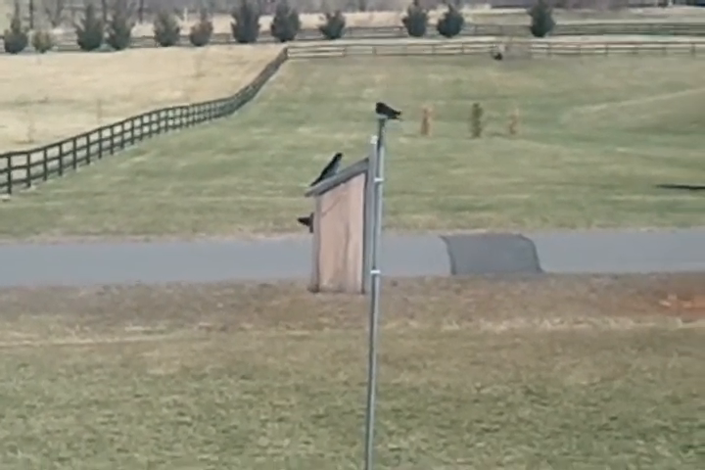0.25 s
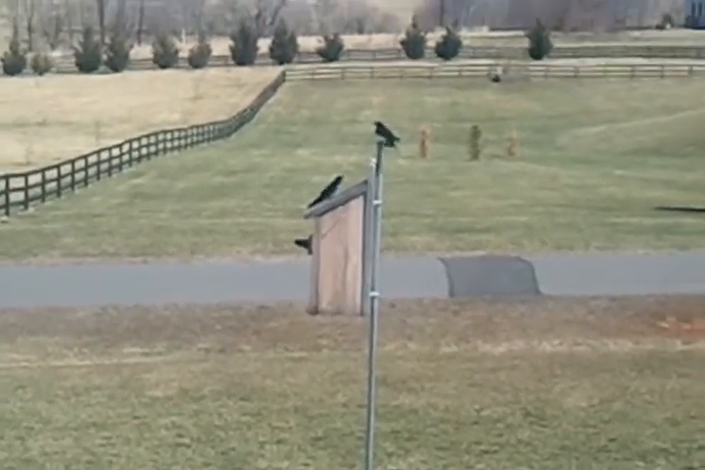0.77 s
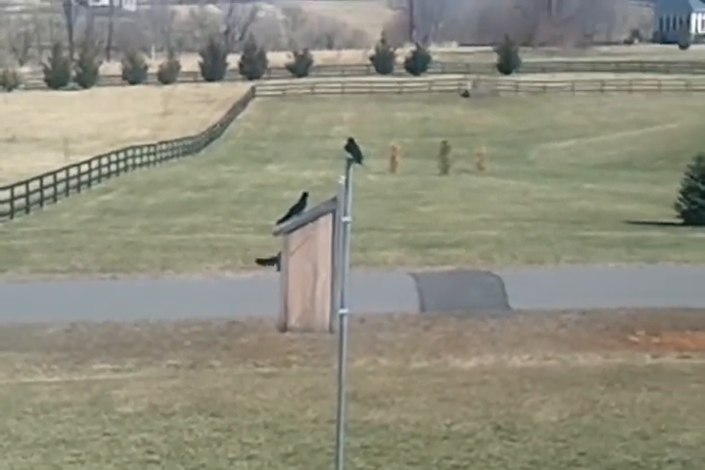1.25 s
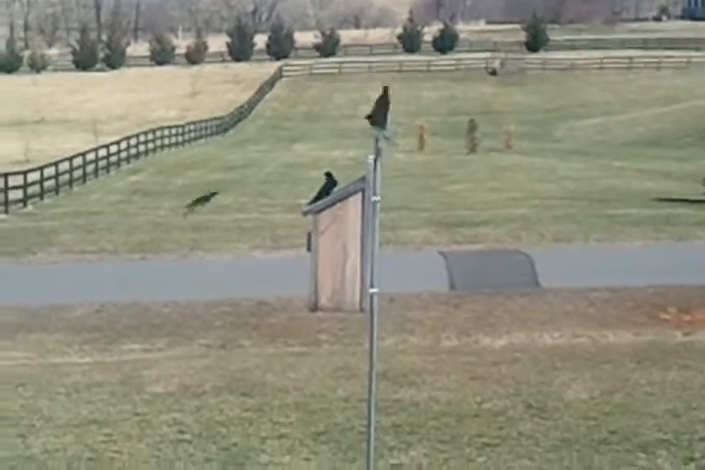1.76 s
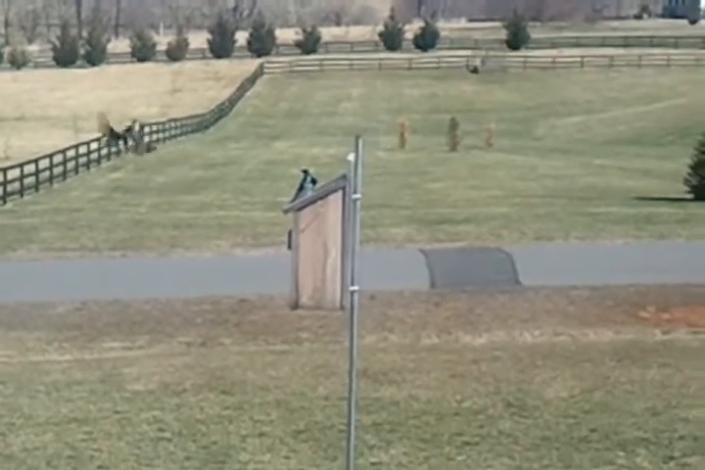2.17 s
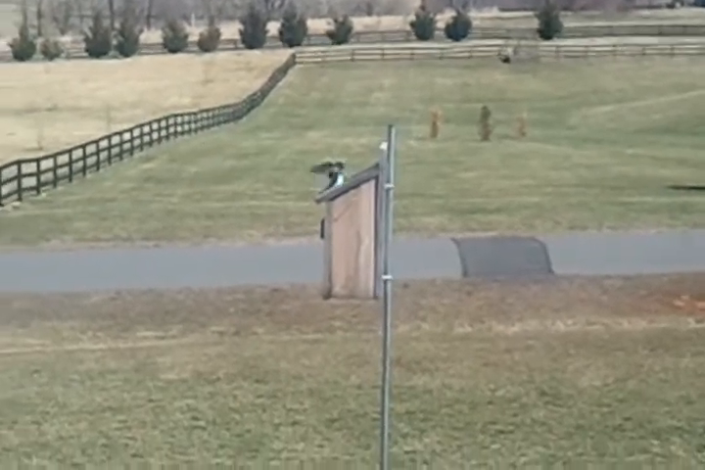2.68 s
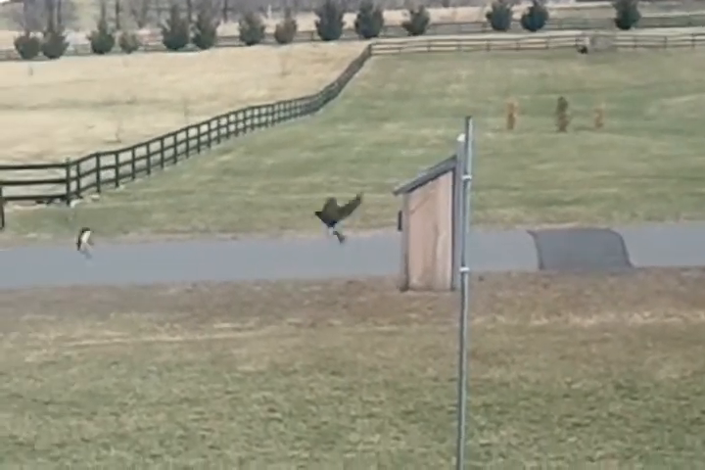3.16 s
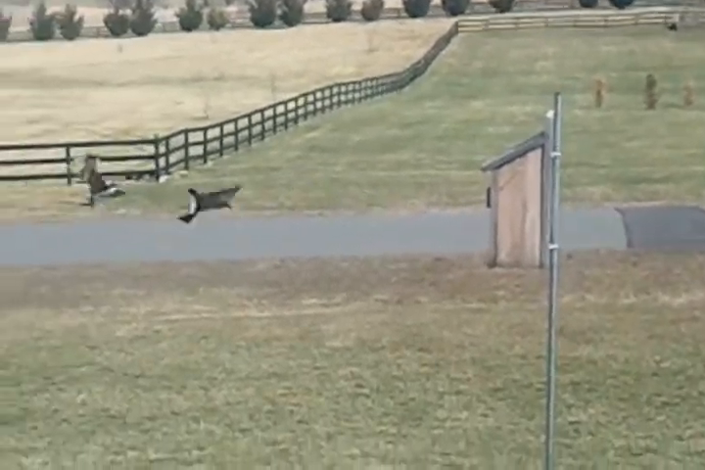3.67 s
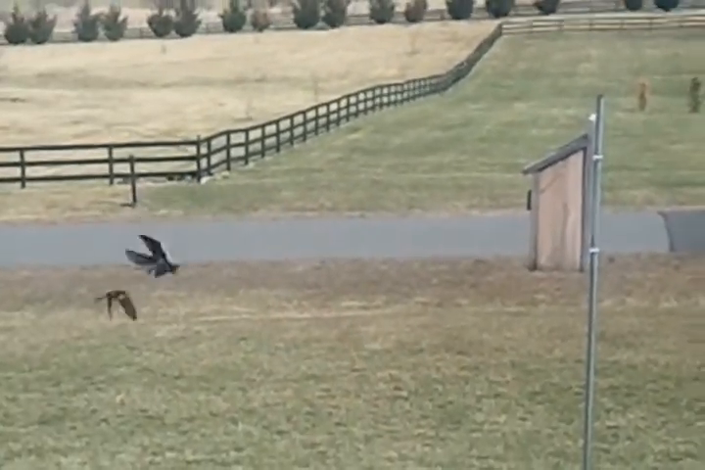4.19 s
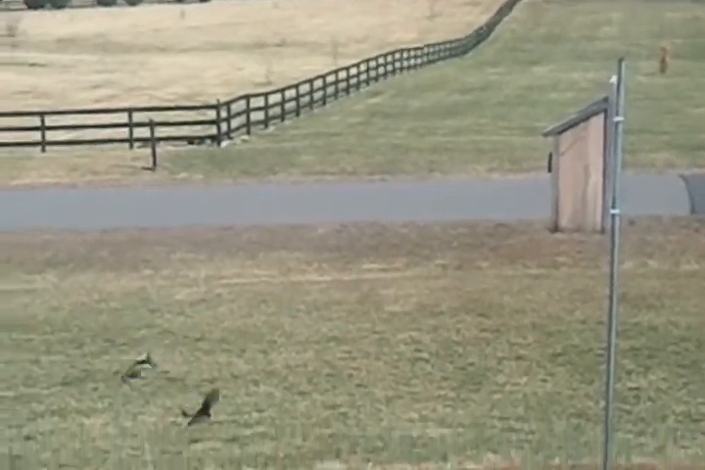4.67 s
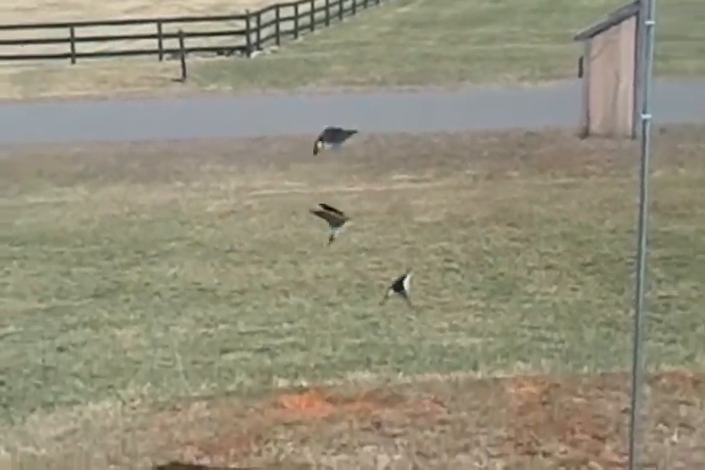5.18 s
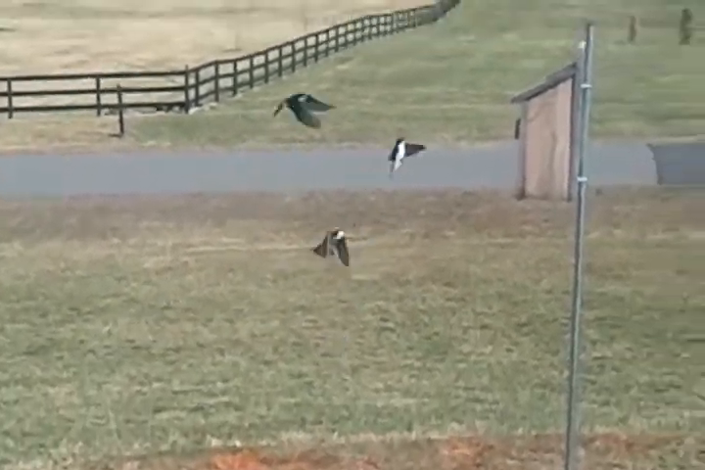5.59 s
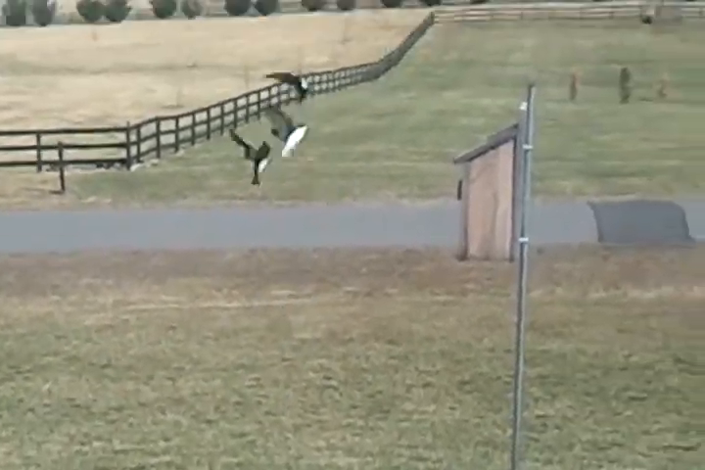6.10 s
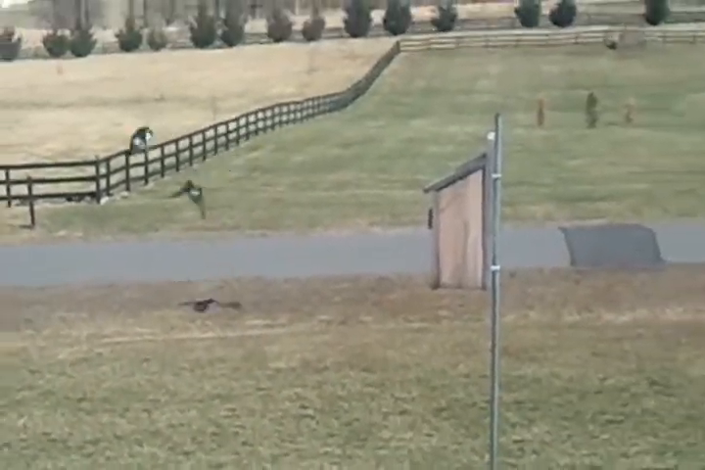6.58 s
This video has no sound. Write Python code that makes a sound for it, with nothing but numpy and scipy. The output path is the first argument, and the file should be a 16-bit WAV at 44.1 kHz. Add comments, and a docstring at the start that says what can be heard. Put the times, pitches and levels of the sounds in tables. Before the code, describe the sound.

Small swallows twitter in rapid, high, chattering bursts around a nest box in an open field while wind rumbles and thumps on the microphone.

```python
"""An open field with a nest box: tree swallows squabble round it, twittering in quick overlapping runs.
Each syllable is four falling whistled notes after a low arched lead-in; single chips and long slurs join them.
Fainter notes and chips come from swallows farther off. The ground and the field return short echoes.
Wind noise and pressure peaks buffet the microphone; a far songbird droops its whistles over shaped-noise hush."""
import sys
import numpy as np
from scipy import signal
from scipy.fft import rfft, irfft
from scipy.io import wavfile
from scipy.ndimage import uniform_filter1d

SR = 44100
rng = np.random.default_rng(int(sys.argv[2]) if len(sys.argv) > 2 else 0)


def digitize_waveform(pressure):
    """Quantize a signal to 16-bit integers and store it at the path in sys.argv[1].

    Rows of a 2-D input are taken as channels; values are limited to [-1, 1].
    """
    field = np.atleast_2d(pressure).T
    bounded = np.clip(field, -1, 1)
    quanta = np.round(bounded * 32767).astype(np.int16)
    wavfile.write(sys.argv[1], SR, quanta)


N = 301644
TIME = np.arange(N) / SR

# Breakpoints of a syllable's four whistled notes, before chance and stretch:
# [t/s from syllable start, f/Hz, level/dB relative]
SYLLABLE_NOTES = [
    [(0, 6140, -23.5), (.0025, 6170, 3), (.0062, 6060, -10.5), (.008, 5440, 2), (.010, 4900, -19.5)],
    [(.009, 5030, -27.5), (.012, 5310, -1.5), (.0152, 5450, 2.5), (.0182, 5300, -6.5), (.021, 4100, -16)],
    [(.0195, 5670, -26.5), (.0218, 5930, 4), (.0245, 5180, 7.5), (.028, 3273, -8), (.0315, 2636, -19.5)],
    [(.030, 4830, -16.5), (.0328, 4600, -0.5), (.036, 3330, 0.5), (.0395, 2600, -11.5), (.047, 2400, -22.5)],
]
# top pitch of the syllable that the notes above describe
USUAL_TOP_HZ = 6300


def from_db(db):
    """Turn decibels into an amplitude factor."""
    return 10 ** (np.asarray(db) / 20)


def rms_one(x):
    """Scale a signal to an RMS of 1."""
    return x / np.sqrt(np.mean(x ** 2) + 1e-20)


def add(out, start, sound):
    """Mix a sound in at a time in seconds, dropping what falls outside."""
    at = round(start * SR) + np.arange(len(sound))
    inside = (at >= 0) & (at < N)
    out[at[inside]] += sound[inside]


def at_hz(points, hz):
    """Read a spectrum's dB on a log-frequency axis."""
    points_hz, points_db = np.transpose(points)
    return np.interp(np.log(hz), np.log(points_hz), points_db)


def drift(cutoff_hz):
    """Smooth random motion of RMS 1: noise below a cutoff, after a second of filter settling."""
    low_pass = signal.butter(2, cutoff_hz, fs=SR, output="sos")
    slow = signal.sosfilt(low_pass, rng.standard_normal(N + SR))
    return rms_one(slow[SR:])


def whistle(hz, gain):
    """A pure tone whose phase accumulates along a pitch track."""
    return gain * np.sin(2 * np.pi * np.cumsum(hz) / SR)


def swallows(syllable_db=0, chip_db=0, slur_db=0):
    """The near birds: each syllable is an arch and four falling notes; lone chips and slurs join the calls."""
    # Chips shaped like a syllable's first note: [t/s, top f/Hz before chance, level/dB before the note shape]
    lone_chips = [(0.92, 5550, -31), (1.963, 6500, -36.5), (2.425, 5990, -18.5), (3.421, 5320, -21),
                  (3.633, 5620, -20), (4.696, 5860, -22), (5.287, 5450, -26), (5.309, 5740, -26)]
    # Long slurred whistles: [t/s, top f/Hz before the slur shape, level/dB before it, length/s]
    long_slurs = [(2.983, 5520, -21.5, .046), (3.025, 5580, -24.5, 0.038), (3.279, 5630, -31, 0.038),
                  (3.361, 5184, -25.5, 0.035), (5.714, 5540, -28.5, .022), (6.095, 5680, -21.5, 0.078),
                  (6.147, 5690, -20, 0.028)]
    # Strength of each of the four notes against its syllable: [level/dB before chance]
    note_strengths = [1, 2, -5.5, -4.5]
    # Loss of each of the four notes in a lower voice: [loss/dB per kHz under the usual top pitch]
    low_voice_loss = [4, 4.5, 0.5, 9.5]
    note_spread_db = 1.82
    arch_lead_s, arch_share, arch_spread = .008, .7, .04  # lead; pitch over syllable top; relative chance

    out = np.zeros(N)
    for s, top_hz, db, opens in syllables():
        # The opening syllable is slower, with a brief, faint arch; arch_s holds for an arch at 4200 Hz
        stretch, arch_db, arch_s = (1.06, -14.5, 0.0044) if opens else (.95, -6.5, .017)
        arch_hz = top_hz * arch_share * (1 + arch_spread * rng.standard_normal())
        arch_sound, rise_s = arch(arch_hz, arch_s)
        add_call(out, s - arch_lead_s - rise_s, from_db(db + arch_db) * arch_sound)

        under_khz = (USUAL_TOP_HZ - top_hz) / 1000
        for shape, note_db, loss in zip(SYLLABLE_NOTES, note_strengths, low_voice_loss):
            chance_db = note_spread_db * rng.standard_normal()
            gain = from_db(db + syllable_db + note_db - loss * under_khz + chance_db)
            sound = gain * note(shape, top_hz / USUAL_TOP_HZ, stretch)
            add_call(out, s + shape[0][0] * stretch, sound)

    for s, top_hz, db in lone_chips:
        chip = note(SYLLABLE_NOTES[0], top_hz / USUAL_TOP_HZ, 0.82)
        add_call(out, s, from_db(db + chip_db) * chip)
    for s, top_hz, db, length in long_slurs:
        add_call(out, s, from_db(db + slur_db) * slur(top_hz, length))
    return out


def syllables():
    """Unroll calls into (s, top Hz, dB, opens call); from the third syllable on the voice tires."""
    # Twittered calls: [t/s, syllables/count, spacing/s, top f/Hz before tiring and chance,
    # level/dB before swell, tiring and note strength, swell/dB from the second syllable on]
    twittered_calls = [(-.003, 4, 0.072, 6186, -22, 3.5), (.076, 1, 0, 5860, -26, 0),
                       (0.311, 2, 0.072, 6320, -20, 0.5), (0.425, 1, 0, 5480, -27, 0),
                       (.483, 2, 0.074, 6044, -23, -0.5), (.696, 2, 0.073, 6200, -17, -3),
                       (0.847, 1, 0, 5660, -28, -2), (1.118, 2, 0.067, 6366, -20.5, -0.5),
                       (1.446, 2, 0.067, 5970, -36.5, 9), (1.586, 2, 0.069, 5990, -23.5, 1.5),
                       (2.163, 1, 0, 5840, -22, 0), (2.258, 1, 0.0012, 5630, -24.5, 0),
                       (2.271, 2, 0.068, 6050, -29, 5.5), (2.407, 1, 0.0011, 5840, -20.5, 0),
                       (2.549, 2, 0.079, 6250, -24, 2.5), (2.562, 1, 0, 5790, -22.5, 0),
                       (2.738, 2, 0.071, 6160, -21.5, -0.5), (2.755, 1, 0.013, 5990, -26, 0),
                       (2.943, 1, 0, 5620, -22, 0), (2.964, 3, 0.057, 5760, -22, 2),
                       (3.166, 3, 0.062, 5930, -22.5, 3.5), (3.247, 2, 0.087, 5750, -27, 2.5),
                       (3.471, 3, 0.065, 5950, -21.5, -0.5), (3.549, 2, 0.064, 5820, -24.5, 7),
                       (3.775, 3, .074, 5944, -23.5, 1), (3.983, 1, 0, 5440, -28, 3),
                       (4.185, 3, 0.064, 5856, -20.5, -0.5), (4.502, 2, 0.062, 6036, -20.5, 0.5),
                       (4.613, 1, 0, 5650, -26, 0), (4.741, 2, 0.034, 5560, -24, -4.5),
                       (4.803, 2, 0.048, 5900, -17.5, -5.5), (4.841, 1, 0.003, 5510, -24.5, 0),
                       (4.929, 1, 0.018, 5640, -23, 0), (5.053, 2, 0.064, 6010, -16.5, -1),
                       (5.355, 2, 0.068, 6120, -18, -2), (5.576, 2, 0.069, 6180, -19, -0.5),
                       (5.783, 2, 0.068, 6120, -20, -0.5), (5.83, 2, 0.07, 5810, -23, -1.5),
                       (5.969, 2, 0.089, 6060, -18.5, -3.5), (6.310, 2, 0.062, 5950, -27.5, 5),
                       (6.584, 2, 0.071, 6036, -23.5, 3), (6.705, 1, 0, 5510, -27.5, 0)]
    tiring_db, tiring_hz = 6.5, 290  # drop per tired syllable
    for s, count, spacing, top_hz, db, swell_db in twittered_calls:
        for k in range(round(count)):
            tired = max(k - 1, 0)
            level_db = db + swell_db * (k > 0) - tiring_db * tired
            yield s + k * spacing, top_hz - tiring_hz * tired, level_db, k == 0


def note(shape, pitch, stretch, wander=0.01, depth_spread=.12, rasp_db=4.0):
    """One swept whistle; it falls to a random depth and noise roughens its level as the pitch drops."""
    s, hz, db = np.transpose(shape)
    hz = hz.max() * (hz / hz.max()) ** (1 + depth_spread * rng.standard_normal())
    hz = hz * (1 + wander * rng.standard_normal(len(hz)))
    t = np.arange(s[0], max(s[-1], s[0] + .002), 1 / SR / stretch)
    # Padding leaves room for the smoothed edges
    gain = np.pad(from_db(np.interp(t, s, db)), 45)
    track = np.pad(np.interp(t, s, hz), 45, mode="edge")
    grain = rms_one(uniform_filter1d(rng.standard_normal(len(track)), size=30))
    rasp = from_db(rasp_db * grain * np.sqrt(2 * (1 - track / track.max())))
    gain = uniform_filter1d(gain, size=80) * rasp
    return whistle(uniform_filter1d(track * pitch, size=100), gain)


def arch(top_hz, length, usual_hz=4200, flat_hz=5000, bend_hz=1500, rise=1.5):
    """A whistle with a slow rise and a quicker drop, and its rise time; high arches are longer and flatter."""
    half = length / 2 * (top_hz / usual_hz) ** 3
    u = np.arange(-rise, 1, 1 / (half * SR))  # the top is at 0
    bend = np.clip(2 * (flat_hz - top_hz), 0, bend_hz)
    hz = top_hz - bend * np.sin(u * np.pi / 2.8) ** 2
    swell_position = np.where(u < 0, u / rise, u)
    gain = np.abs(np.cos(swell_position * np.pi / 2)) ** 0.49
    return whistle(hz, gain), rise * half


def slur(top_hz, length, release_s=0.01):
    """One long whistle through a V-shaped pitch dip; a short one breaks off before the upturn."""
    # Slur shape: [t/s from its start, pitch/share of top, level/dB relative]
    slur_shape = [(0, 0.93, -13), (.005, .93, -0.5), (0.015, .65, -7.5), (0.023, .52, -11),
                  (.030, .49, -16.5), (.040, .62, -10.5), (.046, 0.64, -16.5)]
    s, share, db = np.transpose(slur_shape)
    t = np.arange(0, length, 1 / SR)
    release = np.minimum((length - t) / release_s, 1)
    gain = from_db(np.interp(t, s, db)) * release
    return whistle(top_hz * uniform_filter1d(np.interp(t, s, share), size=200), gain)


def add_call(out, start, sound, ground_db=-14, ground_s=0.0036):
    """A call arrives directly, then weaker off the ground after a delay drawn for each call."""
    add(out, start, sound)
    add(out, start + ground_s * rng.uniform(0.49, 1.4), from_db(ground_db) * sound)


def rivals(under_db=-15, spread_db=3.5, reply_s=.038, joining_s=2.3, joining_db=5, count=9):
    """Swallows farther off answer each syllable with faint notes that follow its level, fainter before the chase."""
    out = np.zeros(N)
    for s, _, syllable_db, _ in syllables():
        for _ in range(count):
            db = syllable_db + under_db + spread_db * rng.standard_normal() - joining_db * (s < joining_s)
            shape = SYLLABLE_NOTES[rng.integers(len(SYLLABLE_NOTES) - 1)]  # one of the first three
            sound = note(shape, rng.uniform(.8, 1.0), rng.uniform(0.53, 1.2))
            add_call(out, s + reply_s * abs(rng.standard_normal()), from_db(db) * sound)
    return out


def flock(level_db=-37, spread_db=0.5, from_s=2.5, to_s=6.8, count=80):
    """During the chase, other swallows scatter faint high chips at random."""
    out = np.zeros(N)
    starts = rng.uniform(from_s, to_s, count)
    pitches = rng.uniform(0.68, 1.05, count)
    stretches = rng.uniform(.6, 1.1, count)
    levels_db = level_db + spread_db * rng.standard_normal(count)
    for s, pitch, stretch, db in zip(starts, pitches, stretches, levels_db):
        add_call(out, s, from_db(db) * note(SYLLABLE_NOTES[0], pitch, stretch))
    return out


def field(x, scatter_db=-16, t60=0.16, echo_s=0.1, echo_db=-24):
    """Grass and fences scatter a short decaying noise tail; the distant tree line returns one faint echo."""
    t = np.arange(SR // 2) / SR
    tail = rng.standard_normal(len(t)) * from_db(-60 * t / t60) * (t > .003)
    scattered = signal.fftconvolve(x, tail / np.linalg.norm(tail))[:N]
    out = x + from_db(scatter_db) * scattered
    add(out, echo_s, from_db(echo_db) * x)
    return out


def wind(level_db=-1, lumpy_db=2, brighten=0.4, usual_db=-24):
    """Turbulence at the microphone port as half-octave noise bands; strong gusts lift the higher bands more."""
    # Rumble spectrum at usual strength: [f/Hz, density/dB per Hz, relative]
    rumble_spectrum = [(25, 5), (55, 6), (100, -2), (160, -13), (250, -26), (400, -44.5), (800, -49.5)]
    gust_db = wind_strength() - usual_db + lumpy_db * drift(20.4)
    edges = 20 * 2 ** np.arange(0, 6, .5)
    out, power = 0, 0
    for low, high in zip(edges, edges[1:]):
        hz = np.sqrt(low * high)
        band_pass = signal.butter(2, [low, high], "band", fs=SR, output="sos")
        band = signal.sosfilt(band_pass, rng.standard_normal(N + SR))[SR:]
        gain = from_db(at_hz(rumble_spectrum, hz)) * np.sqrt(hz)  # bandwidth grows with frequency
        response = 1.5 + brighten * np.clip(np.log2(hz / 60), -1, 2)  # dB out per dB of gust
        out = out + gain * rms_one(band) * from_db(gust_db * response)
        power += gain ** 2
    return from_db(usual_db + level_db) * out / np.sqrt(power)


def wind_strength():
    """Wind strength in dB, before each band's response: calm air, breeze and bell-shaped gusts add in power."""
    # Gusts: [t/s at the height, strength/dB, half length/s to 1/e of its power]
    gusts = [(0, -23.5, 0.11), (0.406, -24, 0.046), (0.569, -23, 0.066), (.8, -20, 0.087),
             (1.434, -27.5, 0.052), (1.781, -23.5, 0.035), (2.383, -22.5, 0.12), (2.734, -24, 0.13),
             (3.116, -22, 0.15), (3.489, -18, 0.062), (3.747, -21.5, 0.053), (4.04, -28, 0.024),
             (4.455, -24, 0.034), (5.51, -24.5, 0.22), (6.448, -22, 0.19)]
    calm_db, breeze_db, breeze_from_s, breeze_rise_s = -30, -23.5, 4.36, 0.045
    breeze = from_db(breeze_db) * np.clip((TIME - breeze_from_s) / breeze_rise_s, 0, 1)
    power = from_db(calm_db) ** 2 + breeze ** 2
    for s, db, half_length in gusts:
        power = power + from_db(db) ** 2 * np.exp(-((TIME - s) / half_length) ** 2)
    return 10 * np.log10(power)


def eddies(level_db=0, core_db=-24, core_share=.35):
    """A passing vortex gives one pressure peak between two shallow dips; its tight core sharpens the tip."""
    # Hardest eddies: [t/s, level/dB before the core is added, width/s (zero pressure at 1.15 of it)]
    hard_eddies = [(0.405, -7, 0.0018), (0.79, -5.5, 0.0016), (3.525, -5.5, 0.0018), (5.137, -7.5, 0.0016),
                   (5.225, -5.5, 0.0018), (5.489, -3.5, 0.0025), (5.537, -6, 0.0022),
                   (5.615, -15.5, 0.00085), (5.898, -4, 0.0014), (6.455, -1.5, 0.0013)]
    out = np.zeros(N)
    for s, db, width in hard_eddies:
        for part_db, share in ((level_db, 1), (core_db, core_share)):
            u = (TIME - s) / (width * share) / 2
            out += from_db(db + part_db) * (1 - 3 * u ** 2) / (1 + u ** 2) ** 3
    return out


def far_bird(level_db=-51, start_hz=2270, fall_hz=200, length=0.072, waver_hz=30, flutter_db=3):
    """A far songbird: soft whistles that droop at the end, with random waver in pitch and flutter in level."""
    # Start of each falling whistle: [t/s]
    whistle_starts = [2.85, 3.71, 3.86, 4.38, 5.72, 6.53, 6.69]
    out, u = np.zeros(N), np.linspace(0, 1, int(length * SR))
    knots = np.linspace(0, 1, num=9)
    for s in whistle_starts:
        waver = np.interp(u, knots, rng.standard_normal(size=9))
        flutter = np.interp(u, knots, rng.standard_normal(size=9))
        hz = start_hz - fall_hz * rng.uniform(.5, 1.5) * u ** 2 + waver_hz * waver
        gain = from_db(level_db + flutter_db * flutter) * np.sin(np.pi * u)
        add(out, s, whistle(hz, gain))
    return out


def hush(level_db=-46.5):
    """Steady far-off air: white noise coloured in the frequency domain and set to an RMS level."""
    # Colour of the hush: [f/Hz, level/dB relative]
    hush_colour = [(100, 5), (300, 2), (700, -0.5), (1400, -5), (2200, -6.5), (4500, -8), (6300, -7),
                   (7400, -20.5)]
    hz = np.maximum(np.arange(N // 2 + 1) * SR / N, 1)
    spectrum = rfft(rng.standard_normal(N)) * from_db(at_hz(hush_colour, hz))
    return from_db(level_db) * rms_one(irfft(spectrum, N))


def scene():
    """Birds in the open field, wind on the microphone and the far hush, in mono."""
    birds = field(swallows() + rivals() + flock() + far_bird())
    return (birds + wind() + eddies() + hush())[None]


def record(dry):
    """The converter sits on a constant offset and softly limits downward swings; the top is cut steeply."""
    offset, room, cutoff_hz = -.391, .33, 7413  # offset and room in full-scale units
    held = dry / (1 + (np.minimum(dry, 0) / room) ** 6) ** (1 / 6)
    low_pass = signal.ellip(10, .2, 70, cutoff_hz, fs=SR, output="sos")
    return signal.sosfilt(low_pass, held) + offset


dry = scene()
out = record(dry)
digitize_waveform(out)
```